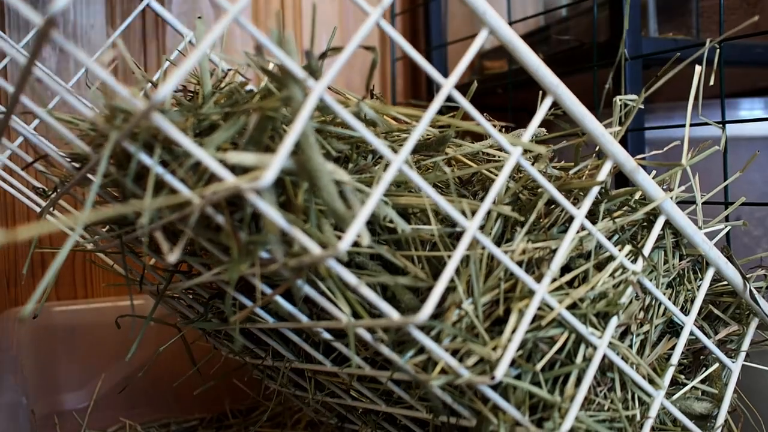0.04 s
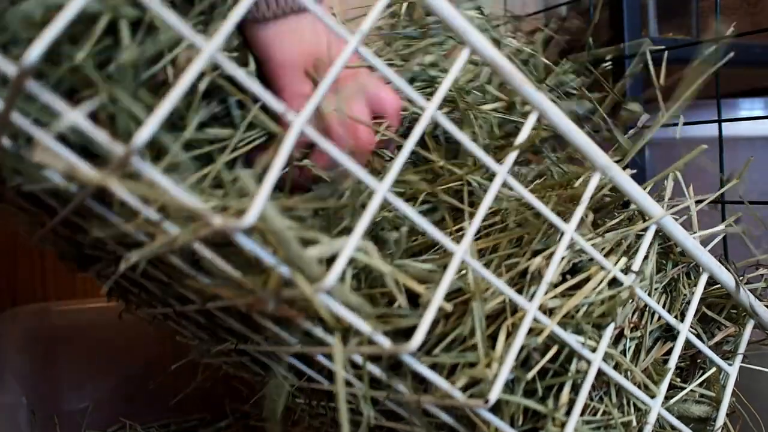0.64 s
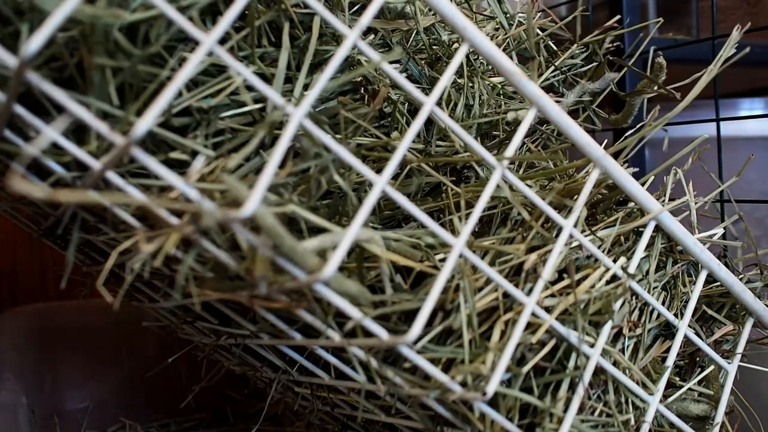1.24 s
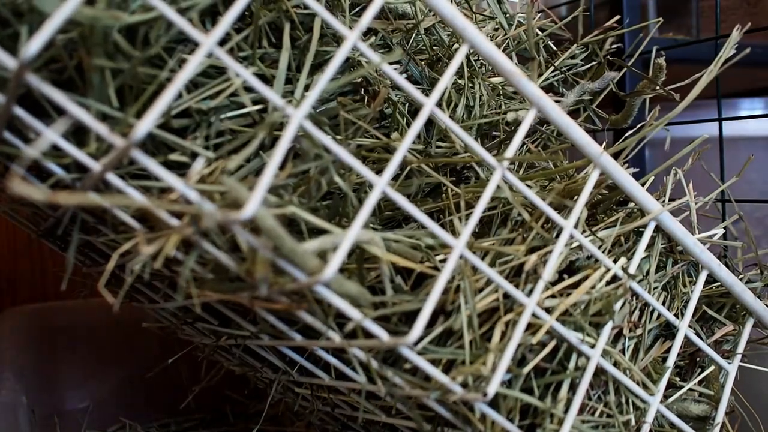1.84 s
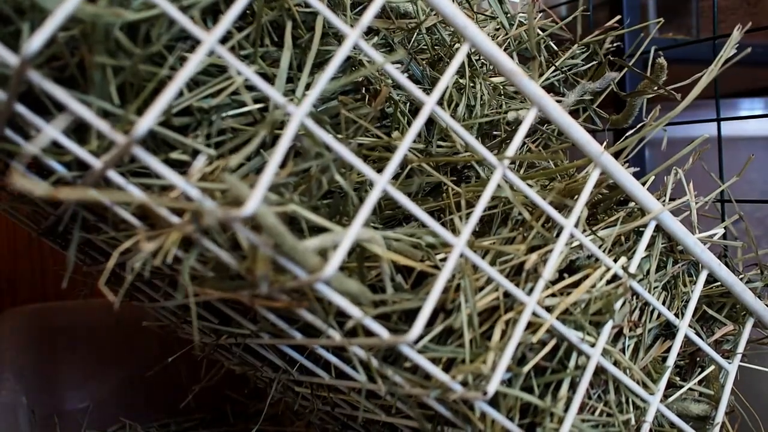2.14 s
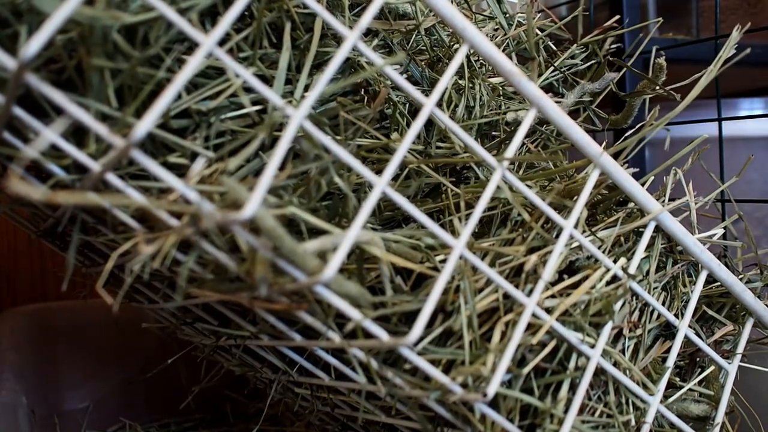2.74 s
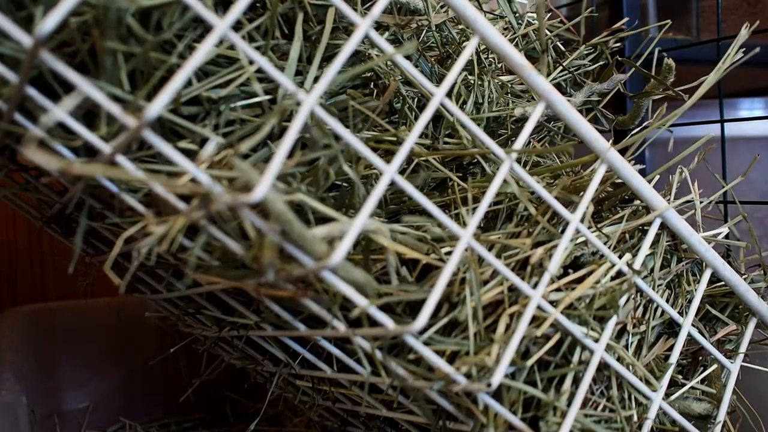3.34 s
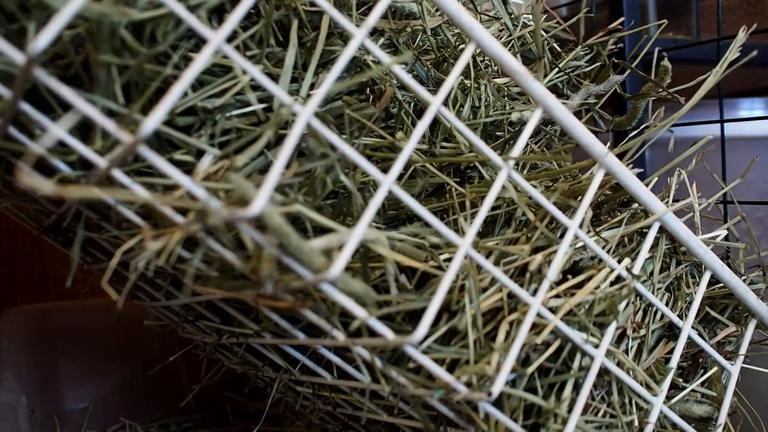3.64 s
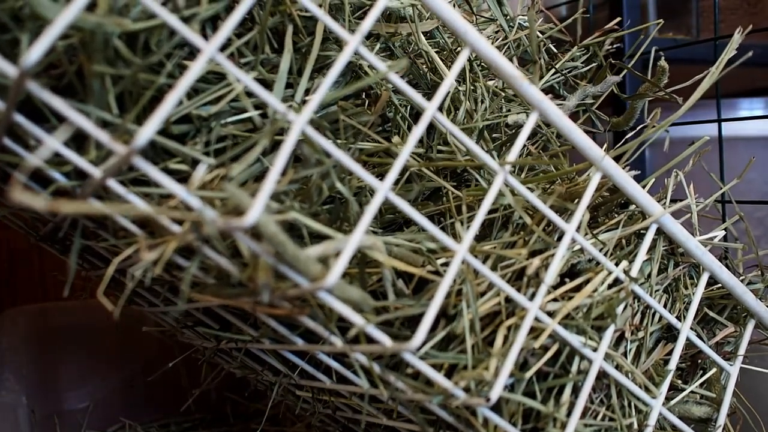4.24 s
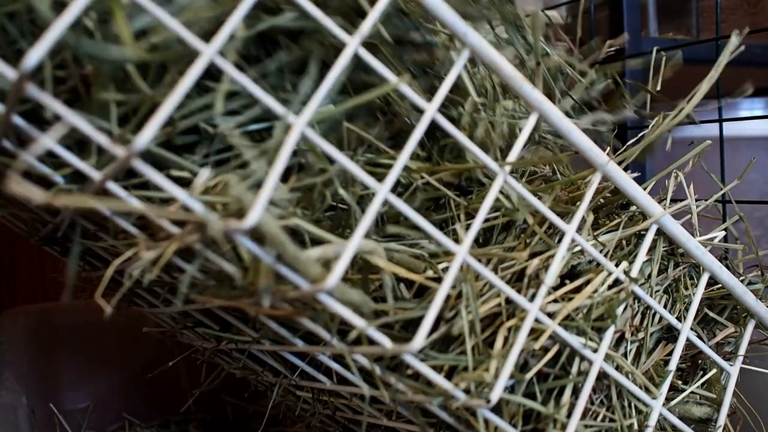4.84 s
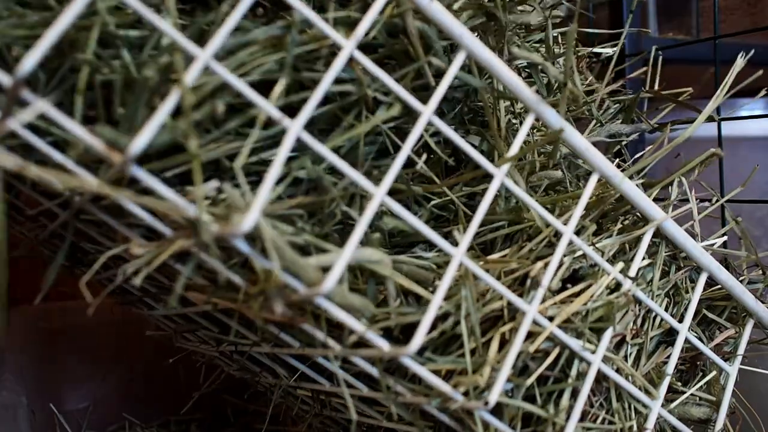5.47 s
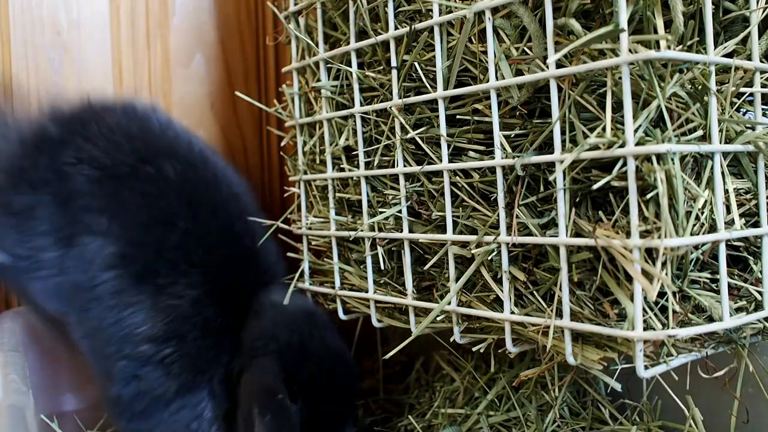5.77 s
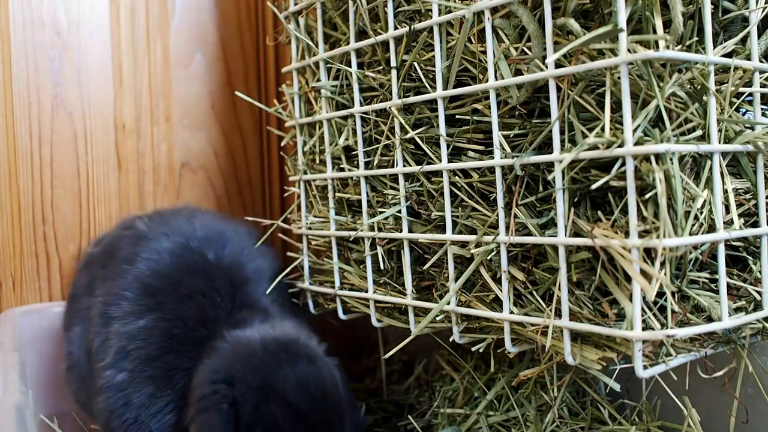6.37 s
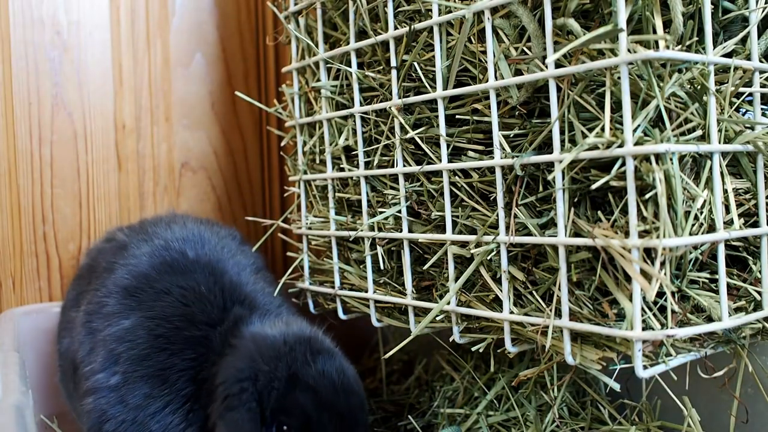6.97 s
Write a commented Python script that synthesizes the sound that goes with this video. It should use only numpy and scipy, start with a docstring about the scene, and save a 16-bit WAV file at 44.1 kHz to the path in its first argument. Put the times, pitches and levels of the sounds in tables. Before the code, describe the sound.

Dry hay crackles and rustles loudly near the microphone as it is stuffed into a wire rack in a small pen, with sharp snaps of stalks and soft thuds from the shaken rack. The packing cuts off abruptly. Then come a short wire clack and light knocks as a rabbit hops, followed by soft paw taps, very faint squeaks and a thin rustle of hay over a low room hush.

```python
"""Hay for a rabbit

A hand slides dry hay into a wire rack and presses it down in short pushes. Stalks crunch and snap,
leaves hiss as they rub, and the rack rumbles against its wooden wall. After a short silence the pen
is quiet: a wire clacks, a rabbit lands softly, and loose hay stirs with faint squeaks.
The rustling is built from thousands of tiny ticks, one for each little break or rub."""
import sys
import numpy as np
from scipy import signal
from scipy.fft import rfft, irfft, next_fast_len
from scipy.io import wavfile
from scipy.ndimage import uniform_filter1d, map_coordinates

SR = 44100
rng = np.random.default_rng(int(sys.argv[2]) if len(sys.argv) > 2 else 0)


def file_out(sig):
    """Save sig as 16-bit WAV at sys.argv[1]."""
    # one column per channel
    cols = np.atleast_2d(sig).T
    # limit, then scale
    lim = np.clip(cols, -1, 1)
    pcm = np.round(lim * 32767).astype(np.int16)
    wavfile.write(sys.argv[1], SR, pcm)


N = 309141

# Table levels are relative: the functions add their own gains. t60 is the time to fade by 60 dB.
# Tone colours, or how strong each pitch is: f/Hz, level/dB
AIR_TONE = [(25, -8), (50, -5.5), (70, -3), (110, -15), (220, 3.5), (290, -1), (370, 3), (560, -4),
            (800, -0.5), (1500, -5.5), (3000, -9.5), (4200, -9.5), (5500, -19.5), (9000, -16), (16000, -29)]  # the room's hush
THICK_STALK_TONE = [(60, -43), (150, -27.5), (300, -25), (420, -4.5), (600, -2.5), (850, 3), (1350, 1),
                    (1750, -2), (2100, -7.5), (3000, -3.5), (5000, -25), (15000, -38)]
THIN_STALK_TONE = [(600, -32), (1400, 0.5), (2000, -5.5), (2400, 0), (3100, 1), (4200, -1), (5200, -9),
                   (8000, -40), (15000, -19)]
LEAF_TONE = [(100, -41.5), (600, -20), (1500, -7.5), (3000, 2), (4300, 3.5), (5100, -3.5), (5900, -3.5),
             (7200, 2), (9500, 2), (12500, 2.5), (15800, 0.5)]
RUMBLE_TONE = [(25, -39.5), (45, -33.5), (70, -11.5), (110, -5), (175, -1.5), (260, -3.5), (315, -7.5),
               (400, -7.5), (600, -9.5), (1200, -38.5)]  # the shaken rack
CRACK_TONE = [(200, -33), (900, -16.5), (3500, 4), (5500, 1.5), (7500, 8), (10000, 1), (13500, -0.5),
              (16000, -20.5)]  # the sharp start of a snap
THUD_TONE = [(30, -29), (70, -10), (120, 0), (200, 0.5), (330, -8), (700, -11.5), (1500, -36)]  # the bundle's soft blow
LOOSE_HAY_TONE = [(1500, -11), (4000, -8), (5500, -4.5), (7500, 2.5), (12000, 2.5), (15800, 0.5)]
PAW_TONE = [(30, -16), (70, 0), (120, -1.5), (200, -0.5), (350, -5), (800, -7), (1500, -19)]
# How alike the two ears hear the hush and the echoes: f/Hz, likeness (0 to 1)
AIR_LIKENESS = [(60, 0.091), (400, 0.3), (1500, 0.54), (3000, 0)]
ECHO_LIKENESS = [(200, 0.95), (700, 0.8), (1500, 0.29), (3000, 0)]
# How long the room rings: f/Hz, t60/s
ROOM_DECAY = [(200, 0.14), (1300, 0.38), (3500, 0.21), (10000, 0.083)]
# How much louder the packing is on the left: f/Hz, level/dB
LEFT_BOOST = [(100, 1), (1000, 1.1), (3000, 1.5), (8000, 3), (15000, 4)]
# Hiss of the bundle sliding in: t/s, level/dB
SLIDE_LEVELS = [(0.0, -37.5), (0.3, -27), (0.62, -23), (0.7, -28), (0.8, -30), (1.02, -43.5), (1.25, -47),
                (1.45, -54), (2.33, -54), (2.43, -47), (3.0, -34.5), (3.48, -47.5), (3.8, -31.5),
                (3.88, -47), (4.08, -35.5), (4.37, -34), (4.93, -24), (5.04, -28.5), (5.15, -27.5),
                (5.23, -32.5), (5.36, -30), (5.48, -45.5)]
# Pushes of the hand, timed at full force: t/s, hold/s, crunch/dB, brightness/dB, rumble/dB
HAND_PUSHES = [(0.01, 0.18, -32, 5.5, -50.5), (0.374, 0.13, -36, 5.5, -48),
               (0.637, 0.022, -35.5, -13, -50.5), (1.003, 0.005, -37.5, -2.5, -51),
               (1.215, 0.018, -43, 1, -59), (1.292, 0.052, -44.5, 5, -51),
               (1.484, 0.095, -35.5, -1.5, -47.5), (1.645, .008, -36.5, -5.5, -55),
               (1.71, 0.047, -40.5, 1.5, -58), (1.898, 0.046, -34, 0.5, -46.5),
               (2.007, 0.0062, -32.5, 1, -45), (2.316, 0.027, -43, -11.5, -61), (2.418, 0.17, -42, 1, -51),
               (2.452, 0.012, -37.5, 6, -50), (2.756, 0.27, -40, 4.5, -51), (2.978, 0.045, -30, 2.5, -42.5),
               (3.113, 0.14, -32.5, 3, -48), (3.364, 0.15, -32, 5.5, -46.5), (3.6, 0.12, -38.5, 4.5, -50.5),
               (3.764, 0.044, -40, 6, -57), (3.97, 0.094, -39, 3.5, -60), (4.04, 0.016, -34.5, -1, -52),
               (4.137, 0.037, -41, 6.5, -50), (4.226, 0.07, -31.5, 0.5, -46), (4.393, 0.03, -40, 6, -56.5),
               (4.488, 0.076, -33.5, 7.5, -49.5), (4.65, 0.11, -28.5, 0.5, -40.5),
               (4.853, 0.096, -41, 10, -54), (5.148, .01, -36, -14, -45), (5.304, 0.028, -45, -15, -50.5)]
# Notes of the wire frame: f/Hz, width/Hz, level/dB
RACK_NOTES = [(177, 27, -0.5), (392.8, 11, 22), (540, 11, 10.5)]
# Stalks that break or flick the wires: t/s, body/dB, f/Hz, crack/dB, splinters/dB
LOUD_SNAPS = [(0.0101, -12.5, 1460, -32, -14), (0.0503, -15, 1400, -17, -14),
              (0.1707, -11.5, 2900, -33, -17.5), (0.1818, -28, 1110, -29.5, -15),
              (0.259, -8, 1390, -29, -15.5), (0.3879, -10.5, 3000, -26, -10),
              (0.6815, -15, 1380, -36, -7.5), (0.6927, -19.5, 1110, -40, -12),
              (0.7089, -18, 1010, -38, -20), (0.7807, -19, 1470, -18, -16), (0.9985, -26, 1510, -38, -10),
              (1.0021, -18, 2800, -21.5, -12), (1.1985, -24, 1200, -29, -4), (1.2137, -22, 2110, -25, -24),
              (1.2428, -24, 2500, -34, -22), (1.2524, -18.5, 1900, -23, -22), (1.3725, -25, 830, -41, -14),
              (1.4685, -23, 1390, -45, -10), (1.5173, -21, 1290, -31, -19), (1.537, -21, 1500, -40, -18),
              (1.548, -21, 2300, -40, -18), (1.6401, -11.5, 1120, -42, -15),
              (1.6795, -13.5, 2300, -40, -18), (1.9156, -18, 1210, -19.5, -13),
              (1.9265, -24, 1700, -34, -18), (1.9633, -22, 1270, -26, -9), (2.0188, -14, 1490, -34, -26),
              (2.0229, -16, 1690, -23.5, -26), (2.033, -15, 1500, -37, -18), (2.063, -27, 1700, -38, -22),
              (2.1267, -19, 2400, -20.5, -30), (2.155, -27, 2000, -29, -24),
              (2.175, -20, 3000, -24.5, -23.5), (2.2254, -26, 3500, -29.5, -16),
              (2.325, -29, 1110, -47.5, -3), (2.3755, -28, 2700, -29, -20), (2.3785, -16.5, 2700, -26, -12),
              (2.3996, -14, 3370, -20.5, -23), (2.4574, -15, 1170, -22, -24),
              (2.466, -16.5, 1700, -30, -11), (2.4701, -19, 1400, -30, -5), (2.546, 0, 3080, -18, -39),
              (2.5465, -19.5, 1200, -42.5, -23.5), (2.8086, -16.5, 2200, -33, -14),
              (2.903, -14.5, 2000, -41, -4), (2.98, -14.5, 1600, -31, -6.5), (3.0082, -8, 2770, -18, -28.5),
              (3.0958, -10, 1120, -26, -18), (3.1565, -11, 2600, -35, -11), (3.1612, -4.5, 1550, -31, -10),
              (3.176, -17.5, 1100, -34.5, -5), (3.2905, -13, 1150, -25, -19), (3.544, -25, 1700, -34, -19),
              (3.5671, -5.5, 4100, -17, -26), (3.78, -5.5, 2120, -14.5, -24), (3.792, -11, 2100, -35, -22),
              (3.8014, -19.5, 2100, -34, -9), (3.838, -18.5, 1300, -38, -23),
              (3.9128, -17.5, 2190, -28, -18), (3.9645, -22, 1200, -38, -12), (4.038, -15, 2800, -26, -20),
              (4.491, -18, 2000, -34, -17), (4.5645, -15.5, 2000, -17, -19), (4.62, -19, 1800, -34, -18),
              (4.6591, -7, 2300, -20, -16.5), (4.72, -14.5, 2400, -22, -18), (4.9302, -10, 3100, -20, -19),
              (5.028, -19, 2400, -33, -22), (5.3015, -19, 1070, -24, -16), (5.3428, -12, 2540, -20, -24),
              (5.355, -23.5, 890, -38, -17), (5.463, -36, 800, -44, -14), (5.5183, -27.5, 2200, -37, -7),
              (5.5766, -36.5, 3770, -17, -40)]
# The bundle bumps the rack against the wall: t/s, level/dB, treble cutoff/Hz
BUNDLE_BUMPS = [(0.017, -26, 230), (0.06, -32, 230), (0.262, -33.5, 1200), (0.45, -30.5, 230),
                (0.68, -30, 250), (0.775, -34, 298), (1.645, -33.5, 1200), (1.87, -33, 250),
                (2.025, -30, 300), (2.228, -29.5, 222), (2.474, -23.5, 200), (2.629, -32, 220),
                (3.16, -26, 500), (3.546, -29.5, 300), (4.05, -34, 700), (4.28, -35, 250), (4.71, -28, 300),
                (4.775, -31, 900), (4.963, -27, 220), (5.146, -28, 800)]
# Notes of the wooden wall: f/Hz, t60/s, level/dB
WALL_NOTES = [(135.7, 0.059, -10.5), (188, 0.08, -5.5), (278, 0.04, -2.5), (418, 0.089, 3),
              (512, 0.08, 6.5), (647, 0.053, 6), (880, 0.045, -3)]
# Dry blades spring free: t/s, level/dB
BLADE_TICKS = [(1.067, -35), (1.2078, -25), (1.222, -33), (1.3589, -31), (1.4258, -31), (1.513, -30),
               (1.6238, -24), (1.7207, -20), (1.7545, -26), (1.793, -36), (1.8181, -29), (2.275, -37),
               (2.3, -40), (2.3193, -26.5), (2.5484, -15.5), (2.585, -20.5), (2.612, -21), (3.148, -28),
               (3.4855, -18.5), (3.606, -27), (4.396, -18), (4.411, -17), (4.44, -18), (5.425, -27),
               (5.49, -23.5), (5.543, -25)]
# Knocks as the rabbit hops: t/s, body/dB, f/Hz, crack/dB, rattle/dB
HOP_KNOCKS = [(5.7925, -21, 3400, -26.5, -8), (5.794, -35, 1120, -60, -12), (5.829, -35.5, 750, -55, -11),
              (5.8375, -38, 1300, -55, -27), (5.838, -38, 360, -55, -23), (5.842, -47, 125, -70, -26),
              (5.911, -23.5, 1650, -48, -32), (5.914, -37, 600, -60, -4), (6.195, -48, 219, -70, -14),
              (6.345, -45, 1300, -70, -2)]
# A wire is flicked: t/s, level/dB, treble cutoff/Hz
WIRE_FLICKS = [(5.793, -26.5, 12000)]
# Notes of that wire: f/Hz, t60/s, level/dB
WIRE_NOTES = [(2350, 0.03, -16), (3120, .024, -7), (3350, 0.028, 1.5), (3700, 0.023, 0.5), (4200, 0.03, -1),
              (5480, 0.02, -2.5), (6600, .02, -8)]
# The rabbit stirs loose hay: t/s, hold/s, stalks/dB, leaves/dB
HAY_STIRS = [(5.794, .005, -42, -38), (5.883, 0.013, -48, -44.5), (5.975, 0.23, -61, -55),
             (6.301, 0.19, -56.5, -60), (6.56, 0.44, -71, -56.5), (6.92, .08, -68, -48.5)]
# Paws on the floor: t/s, level/dB
PAW_LEVELS = [(5.81, -85), (5.835, -50), (5.88, -53), (6.06, -57.5), (6.45, -69)]
# Squeaks as the rabbit noses about: t/s, length/s, starting f/Hz, level/dB
FAINT_SQUEAKS = [(6.18, .07, 2510, -57), (6.387, 0.076, 2480, -60), (6.43, 0.087, 3000, -64)]

PACKING_END_S, SILENCE_END_S = 5.5785, 5.697


def amp(db):
    """Turn decibels into a multiplier."""
    return 10 ** (np.asarray(db) / 20)


def unit(x):
    """Scale a signal to an average power of 1."""
    return x / np.sqrt(np.mean(x ** 2) + 1e-20)


def along(points, hz):
    """Read between a table's rows on a log frequency scale."""
    f, values = np.transpose(points)
    return np.interp(np.log(hz + 1), np.log(f + 1), values)


def curve(rows):
    """Join (time, value) points into one value per sample."""
    return np.interp(np.arange(N) / SR, *np.transpose(rows))


def wobble(rate):
    """A smooth curve through `rate` random points a second."""
    return map_coordinates(rng.standard_normal(int(N * rate / SR) + 4), [np.arange(N) * rate / SR])


def together(*levels_db):
    """The level in dB of unrelated sounds heard at once."""
    return 10 * np.log10(sum(amp(db) ** 2 for db in levels_db) + 1e-20)


def swells(starts, holds, levels_db, rise_s, t60):
    """Level in dB of strokes that each reach full force on time, hold and die away."""
    t = np.linspace(0, N / SR, 4000)[:, None]
    rise = np.clip(1 + (t - starts) / rise_s, 0, 1)
    fade_db = 60 * np.clip((t - starts - holds) / t60, 0, 2)
    power = np.sum((rise * amp(levels_db - fade_db)) ** 2, axis=1)
    return 10 * np.log10(np.interp(np.arange(N) / SR, t[:, 0], power) + 1e-20)


def filtered(x, response):
    """Multiply each frequency in x by response(hz)."""
    n = x.shape[-1]
    padded = next_fast_len(n + SR // 4)
    return irfft(rfft(x, padded) * response(np.fft.rfftfreq(padded, 1 / SR)), padded)[..., :n]


def coloured(x, tone, size=4096):
    """Give x a tone colour while its clicks keep their sharp start."""
    cepstrum = irfft(np.log(amp(along(tone, np.fft.rfftfreq(size, 1 / SR)))))
    cepstrum[1:size // 2] *= 2
    cepstrum[size // 2 + 1:] = 0  # nothing rings ahead of a click
    impulse = irfft(np.exp(rfft(cepstrum)))
    return signal.oaconvolve(x, impulse[None], axes=1)[:, :x.shape[1]]


def paired(two, likeness):
    """Blend two unrelated signals into a left and right of the given likeness."""
    turn = lambda hz: np.arccos(np.clip(along(likeness, hz), -1, 1)) / 2
    mid, side = filtered(two, lambda hz: np.array([np.cos(turn(hz)), np.sin(turn(hz))]))
    return np.array([mid + side, mid - side])


def grains(rate, life_s, top_hz, scatter_db, spread, lead=2.7, size=80):
    """Tiny breaks: `rate` fading ticks a second, each with its own pitch, strength and direction."""
    count, t = int(rate * N / SR), np.arange(size) / SR
    when, pitch, force, side = rng.random((count, 4)).T
    start = (when * N).astype(int)
    strength = (-1.) ** np.arange(count) * amp(-scatter_db * np.log(force + .01))
    ticks = strength[:, None] * np.cos(2 * np.pi * top_hz * pitch[:, None] * t) * np.exp(-t / life_s)
    right_delay = np.rint(lead + spread * np.tan(2.6 * (side - .5))).astype(int)  # in samples
    place = lambda at: np.bincount(((at[:, None] + np.arange(size)) % N).ravel(), ticks.ravel(), N)
    return np.array([place(start), place(start + right_delay)])


def air():
    """The steady hush of the room."""
    return amp(-55.5) * unit(paired(coloured(rng.standard_normal((2, N)), AIR_TONE), AIR_LIKENESS))


def room(x, tail_db, near_db, sections, near_t60=0.022):
    """The pen's walls echo at once and the room rings on; fresh echoes per section mimic moving hay."""
    out, edges = np.zeros((2, N + SR)), np.linspace(0, N, sections + 1).astype(int)
    hz, t, noise = signal.stft(rng.standard_normal((2, sections, SR // 5)), SR, nperseg=256)
    tail = signal.istft(noise * amp(-60 * t / along(ROOM_DECAY, hz)[:, None]), SR, nperseg=256)[1]
    t = np.arange(tail.shape[-1]) / SR
    near = rng.standard_normal(tail.shape) * amp(-60 * t / near_t60) * (t > .002)
    paths = (amp(tail_db) * unit(tail) + amp(near_db) * unit(near)) / np.sqrt(len(t))
    for k, (start, end) in enumerate(zip(edges, edges[1:])):
        echo = signal.fftconvolve(x[:, start:end], paired(paths[:, k], ECHO_LIKENESS), axes=1)
        out[:, start:start + echo.shape[1]] += echo
    return x + out[:, :N]


def hand_effort():
    """Pushing, sliding and just holding the hay set how loud each part of it is."""
    slide_db = curve(SLIDE_LEVELS)
    starts, holds, crunch_db, bright_db, rumble_db = np.transpose(HAND_PUSHES)
    push = lambda db: swells(starts, holds, db, rise_s=0.026 + 0.57 * holds, t60=0.63)
    thick_db = together(push(crunch_db), slide_db - 13.5, -49)  # held hay keeps creaking
    thin_db = together(push(crunch_db + bright_db), slide_db - 14.5, -47.5)
    leaf_db = together(push(crunch_db + 1.5 * bright_db) - 8, slide_db)
    rack_db = together(push(rumble_db), -56)
    return thick_db, thin_db, leaf_db, rack_db


def slips(per_s=49, fade_s=0.014):
    """Jumps in dB: a clump suddenly gives way, then its crackle fades."""
    jolts = (rng.random(N) < per_s / SR) * rng.random(N) * 2
    swing = signal.lfilter([1], [1, -np.exp(-1 / (fade_s * SR))], jolts)
    return 2.5 * np.minimum(swing, 2)


def shifting_load(x, depth_db):
    """Different stalks take the load in turn, so bands of pitch swell and fade on their own."""
    bands = signal.stft(x, nperseg=512)[2]
    drift = uniform_filter1d(rng.standard_normal(bands.shape[1:]), size=7, axis=0)
    drift = uniform_filter1d(drift, size=14, axis=1)
    return signal.istft(bands * amp(depth_db * unit(drift)), nperseg=512)[1][:, :N]


def stalks(thick_db, thin_db):
    """Thick stalks crunch low and thin ones crackle high; both give way in the same clumps."""
    clumps = amp(slips() + 1.1 * wobble(80) + 0.5 * wobble(22.1))
    crunch = grains(rate=1600, life_s=0.0006, top_hz=3390, scatter_db=0.5, spread=1.0)
    crackle = grains(rate=1900, life_s=0.0003, top_hz=5200, scatter_db=1.5, spread=1.5, size=64)
    thick = shifting_load(coloured(crunch * clumps, THICK_STALK_TONE), depth_db=1.8)
    thin = coloured(crackle * clumps, THIN_STALK_TONE)
    return amp(thick_db - 1.62) * unit(thick) + amp(thin_db - 2.5) * unit(thin)


def leaves(level_db):
    """Dry blades rub in a dense fizz; single prickles stand out when it gets quiet."""
    fizz = grains(rate=13000, life_s=0.0001, top_hz=16450, scatter_db=0, spread=1.3, size=20)
    fizz = unit(coloured(fizz * amp(0.99 * wobble(60)), LEAF_TONE))
    prickle = grains(rate=140, life_s=0.00008, top_hz=17000, scatter_db=5.5, spread=0.6, size=20)
    return amp(level_db) * fizz + amp(0.48 * level_db - 33) * unit(coloured(prickle, LEAF_TONE))


def rack(level_db):
    """Catching stalks jog the wire frame and the wooden wall behind it."""
    jogs = grains(rate=800, life_s=0.00017, top_hz=1200, scatter_db=3.5, spread=1.0)
    ring = filtered(jogs, lambda f: sum(amp(db) * 1j * f * width / (hz * hz - f * f + 1j * f * width)
                                        for hz, width, db in RACK_NOTES))
    return amp(level_db - 3) * unit(coloured(jogs, RUMBLE_TONE)) + amp(level_db - 9) * unit(ring)


def snaps(rows, cycles, splinter_t60, body_db, crack_db, tear_db, lead):
    """A snap or knock is a sharp crack and a short ring, repeated in quick, weaker splinters."""
    out, t = np.zeros((2, N + SR)), np.arange(SR // 10) / SR
    click = coloured((t == 0)[None] * 1., CRACK_TONE)[0]
    widen = 1 + .5 / cycles  # a shorter ring covers more pitches
    for s, db, hz, sharp_db, splinter_db in rows:
        splinters = rng.standard_normal(len(t)) * (rng.random(len(t)) < .03)
        splinters *= amp(splinter_db - 60 * t / splinter_t60)
        tears = amp(tear_db + splinter_db / 2) * rng.choice([-1, 1], 4)
        splinters[rng.integers(SR // 1500, SR // 200, len(tears))] = tears
        splinters[0] = 1  # the first break
        # a thin stalk gives off almost nothing below its own pitch
        band = signal.butter(2, np.clip([hz / widen, hz * widen], 50, 4700), "band", fs=SR)
        ring = signal.lfilter(*band, t == 0)
        shape = amp(db + body_db) * ring / abs(ring).max() + amp(sharp_db + crack_db) * click
        hit = signal.fftconvolve(splinters, shape)[:len(t)]
        out[0, round(s * SR):][:len(t)] += hit
        out[1, round(s * SR + lead):][:len(t)] += hit
    return out[:, :N]


def breaking_stalks(crackle_db, per_s=4, middle_hz=2100, spread_octaves=0.73, blade_hz=3500):
    """Loud snaps, ticking blades, and random small snaps that grow as the hay is worked harder."""
    when, force, thinness = rng.random((int(per_s * PACKING_END_S), 3)).T
    times = when * PACKING_END_S
    levels_db = crackle_db[(times * SR).astype(int)] + 3.5 * (2 * force - 1)
    pitches = middle_hz * 2 ** (spread_octaves * (2 * thinness - 1))
    small = [(s, db + 8.5, hz, db - 4, -9) for s, db, hz in zip(times, levels_db, pitches)]
    ticks = [(s, db - 18, blade_hz, db, -22) for s, db in BLADE_TICKS]
    return snaps(LOUD_SNAPS + ticks + small, cycles=0.8, splinter_t60=0.06,
                 body_db=0, crack_db=12.5, tear_db=-2.5, lead=3)


def struck(rows, notes, rise_s):
    """Each blow rings the same notes at new strengths; a soft blow reaches only the low ones."""
    out, t = np.zeros(N + SR), np.arange(SR // 5) / SR
    for s, db, cutoff_hz in rows:
        ring = 0
        for hz, t60, note_db in notes:
            fade = amp(note_db + rng.normal(0, 2.9) - 60 * t / t60)
            ring += fade / np.hypot(1, (hz / cutoff_hz) ** 2) * np.sin(2 * np.pi * (hz * t + rng.random()))
        out[round(s * SR):][:len(t)] += amp(db) * ring * (1 - np.exp(-t / rise_s))
    return out[:N]


def bumps():
    """The bundle lands on the rack with a dull thud, and the wooden wall rings briefly."""
    starts, levels_db, _ = np.transpose(BUNDLE_BUMPS)
    thud_db = swells(starts, 0.0084, levels_db - 16.5, rise_s=0.008, t60=0.1)
    thud = unit(coloured(rng.standard_normal((1, N)), THUD_TONE))
    return amp(thud_db) * thud + amp(-6) * struck(BUNDLE_BUMPS, WALL_NOTES, rise_s=0.0021)


def packing():
    """The hay is worked a little to the left; leaves sound from deep in the pen, snaps from close by."""
    thick_db, thin_db, leaf_db, rack_db = hand_effort()
    breaks = breaking_stalks(thin_db)
    frame = rack(rack_db) + bumps()
    close = room(stalks(thick_db, thin_db) + frame + breaks, tail_db=-11, near_db=-14.5, sections=14)
    deep = room(leaves(leaf_db), tail_db=-11, near_db=-7, sections=96)
    return filtered(close + deep, lambda hz: amp(np.outer([.5, -.5], along(LEFT_BOOST, hz))))


def hop():
    """The hopping rabbit knocks the pen, and a flicked wire rings."""
    knocks = snaps(HOP_KNOCKS, cycles=0.84, splinter_t60=0.03,
                   body_db=-2.5, crack_db=7.5, tear_db=1.5, lead=0)
    return knocks + amp(-0.5) * struck(WIRE_FLICKS, WIRE_NOTES, rise_s=0.00025)


def loose_hay():
    """Stirred stalks crackle and leaves fizz, then settle to a faint rustle."""
    starts, holds, *levels_db = np.transpose(HAY_STIRS)
    stalk_db, leaf_db = [together(swells(starts, holds, db, rise_s=0.005, t60=0.38), -62.5)
                         for db in levels_db]
    crackle = grains(rate=2000, life_s=0.0004, top_hz=6030, scatter_db=3.5, spread=3.8, lead=-4.5)
    fizz = grains(rate=4700, life_s=0.00016, top_hz=17200, scatter_db=2, spread=2.7, lead=-5, size=20)
    return (amp(stalk_db - 3.5) * unit(coloured(crackle, THIN_STALK_TONE))
            + amp(leaf_db - 2) * unit(coloured(fizz, LOOSE_HAY_TONE)))


def paws():
    """Soft paws shuffle on the floor in small, low taps."""
    taps = grains(rate=170, life_s=0.00027, top_hz=1200, scatter_db=1, spread=2, lead=0)
    return amp(curve(PAW_LEVELS) - 3.5) * unit(coloured(taps, PAW_TONE))


def squeaks(rise_octaves=0.223, roughness=0.037):
    """Each squeak swells and fades while its rough pitch climbs."""
    out, waver = np.zeros(N), 1 + roughness * wobble(500)
    for s, length, hz, db in FAINT_SQUEAKS:
        start, progress = round(s * SR), np.linspace(0, 1, round(length * SR))
        span = slice(start, start + len(progress))
        pitch = hz * 2 ** (rise_octaves * progress) * waver[span]
        out[span] += amp(db) * np.sin(np.pi * progress) * np.sin(2 * np.pi * np.cumsum(pitch) / SR)
    return out


def rabbit():
    """The rabbit is farther off, so more of its sound arrives as echo."""
    return room(loose_hay() + paws() + hop() + squeaks(), tail_db=-3, near_db=-1, sections=64)


def scene():
    """The hay is packed; then the rabbit moves in the quiet pen."""
    return np.where(np.arange(N) / SR < PACKING_END_S, packing(), rabbit()) + air()


def record(dry, offset=-0.004, top_hz=15950):
    """Shift the wave just below zero, go silent briefly after the packing and cut the highest treble."""
    t = np.arange(N) / SR
    audible = uniform_filter1d(1. * ((t < PACKING_END_S) | (t > SILENCE_END_S)), size=64)
    return filtered((dry + offset) * audible, lambda hz: 1 / np.sqrt(1 + (hz / top_hz) ** 260))


dry = scene()
out = record(dry)
file_out(out)
```